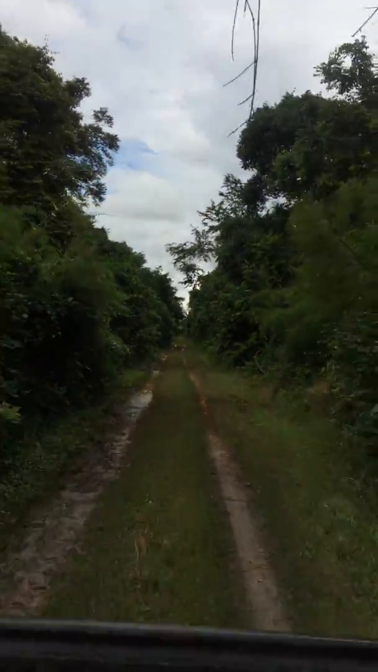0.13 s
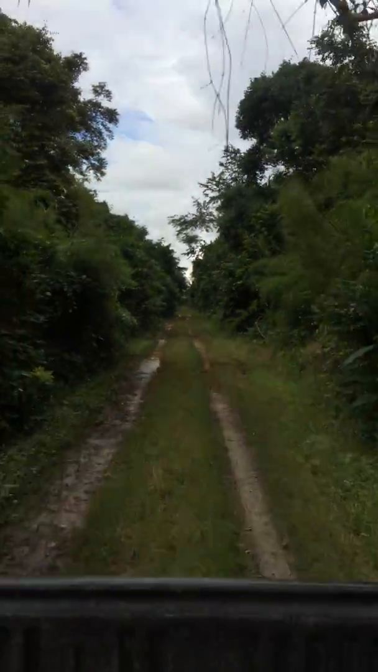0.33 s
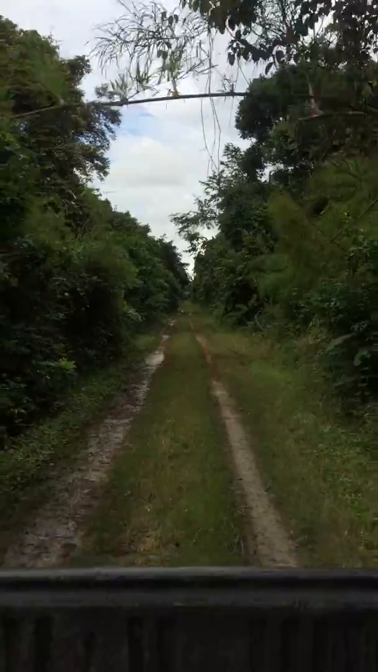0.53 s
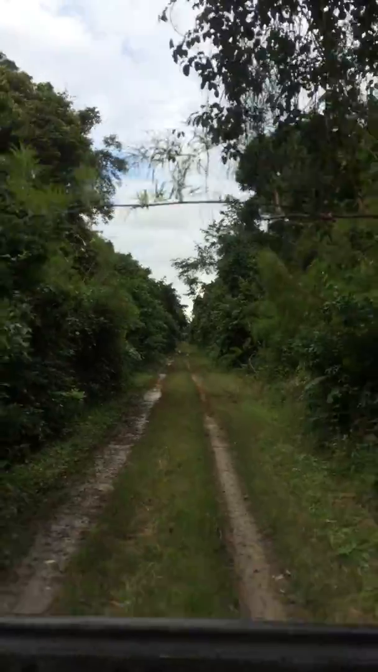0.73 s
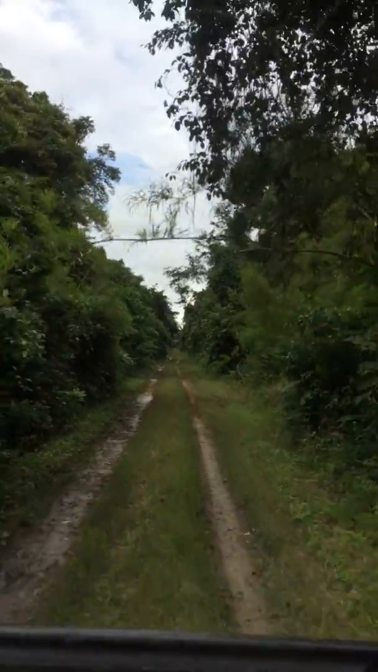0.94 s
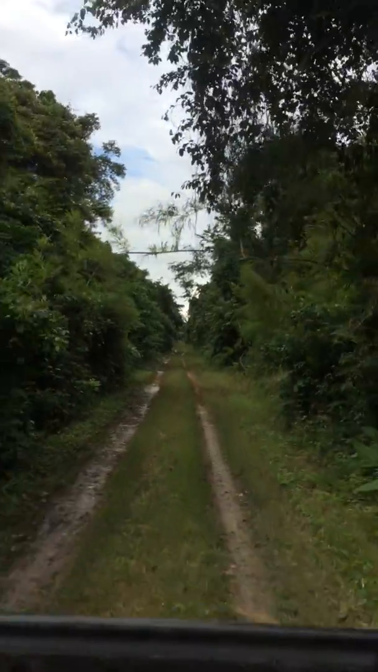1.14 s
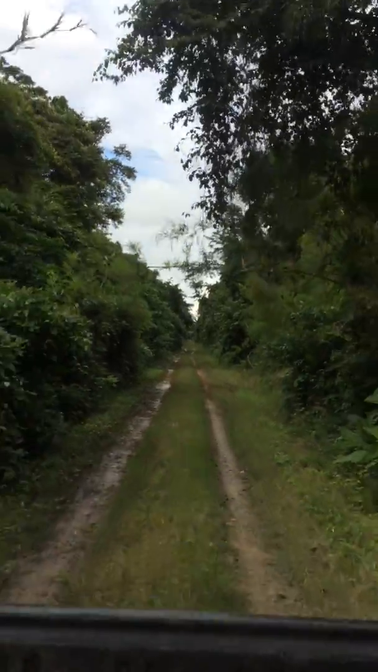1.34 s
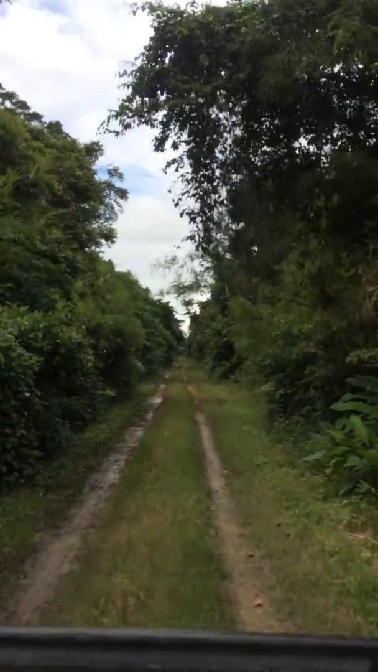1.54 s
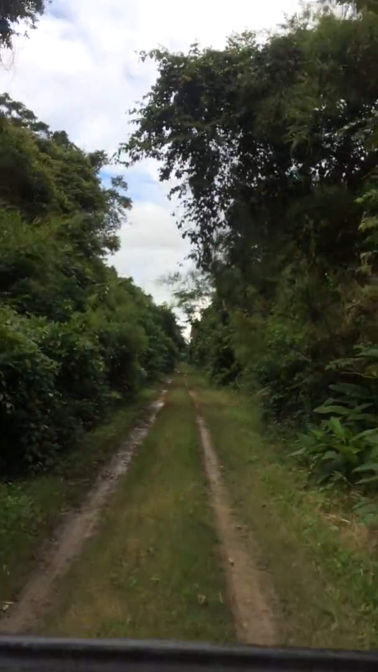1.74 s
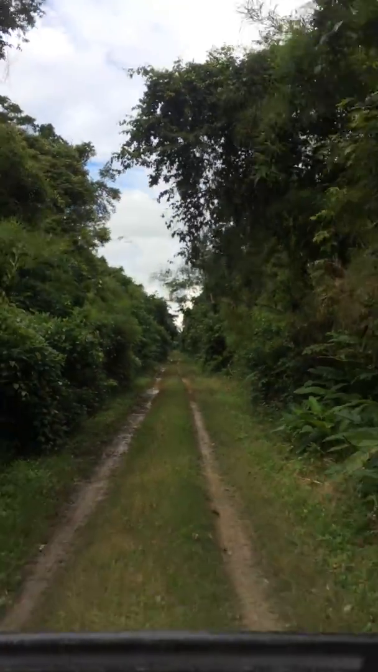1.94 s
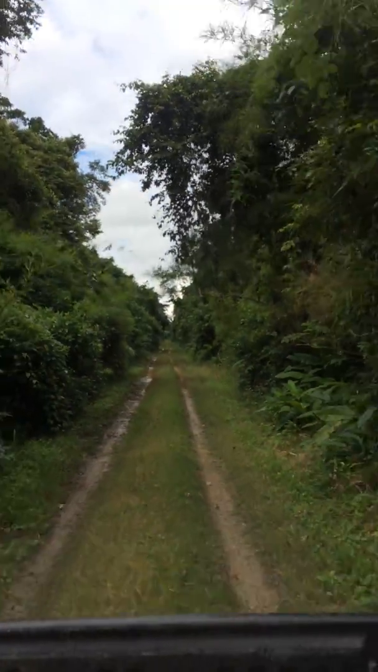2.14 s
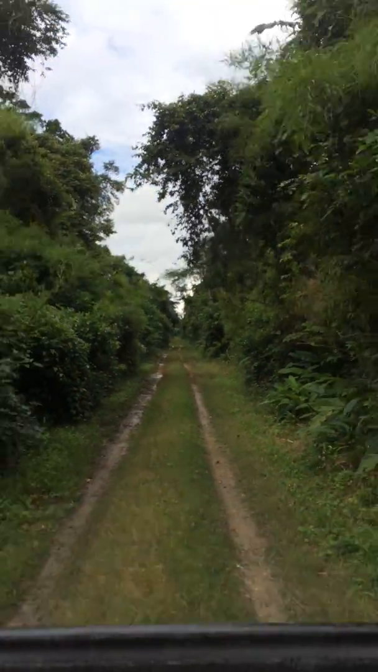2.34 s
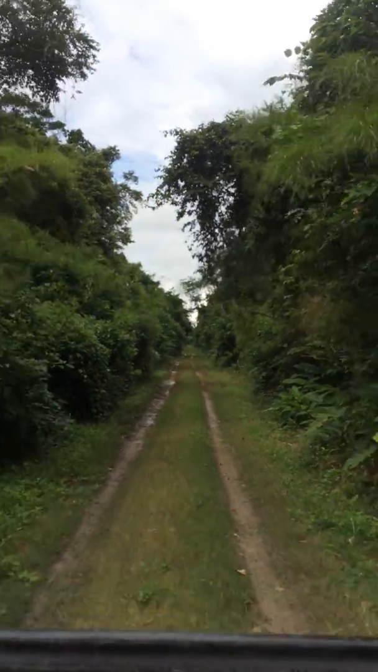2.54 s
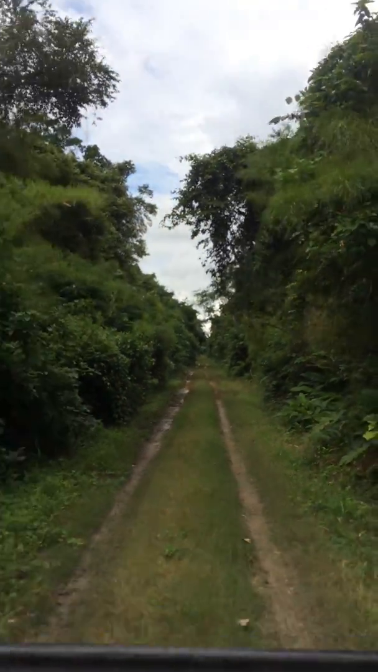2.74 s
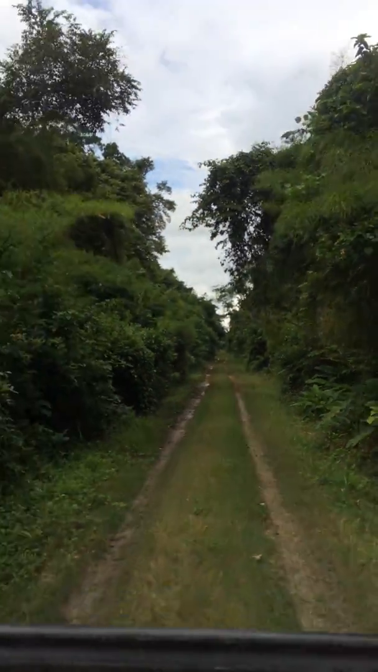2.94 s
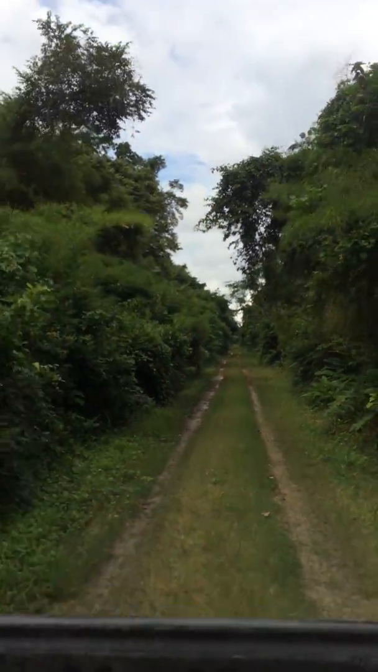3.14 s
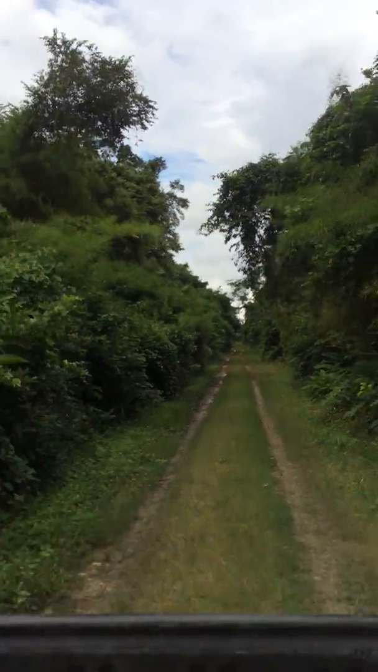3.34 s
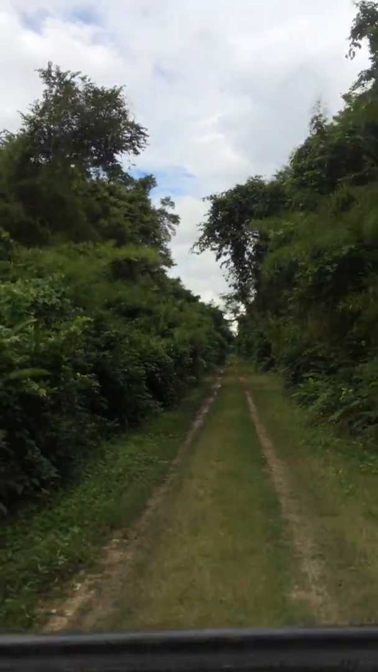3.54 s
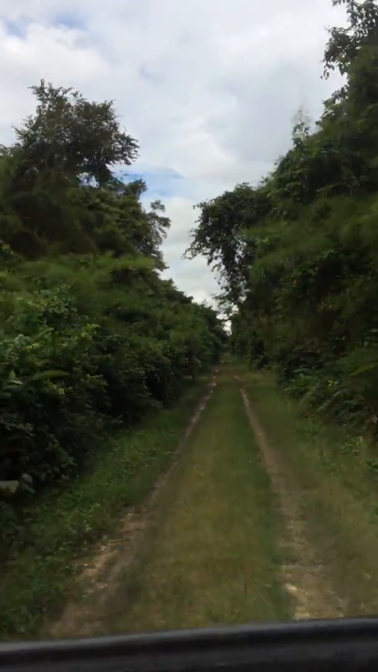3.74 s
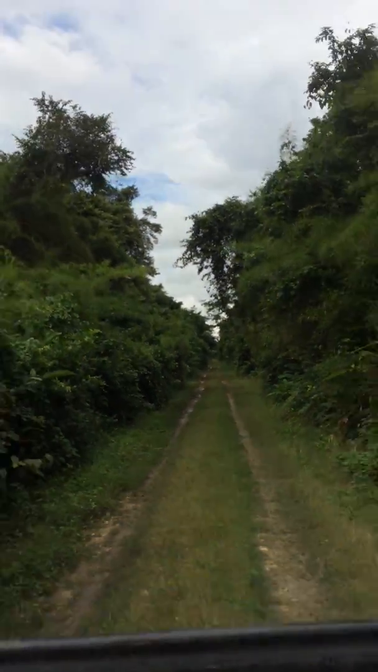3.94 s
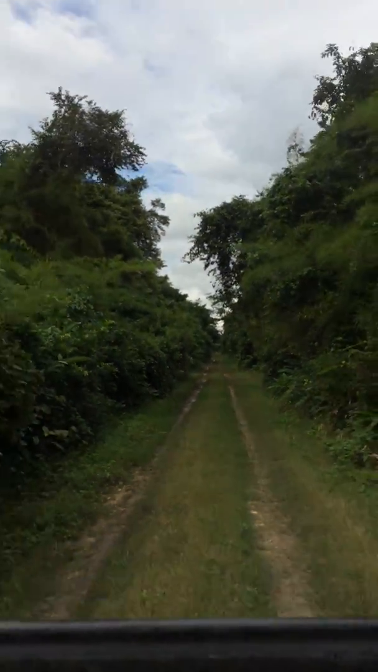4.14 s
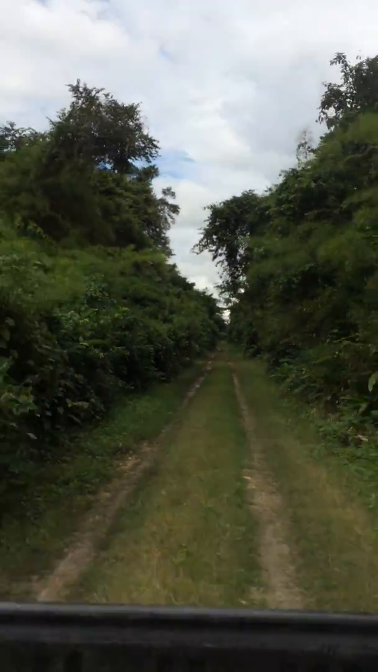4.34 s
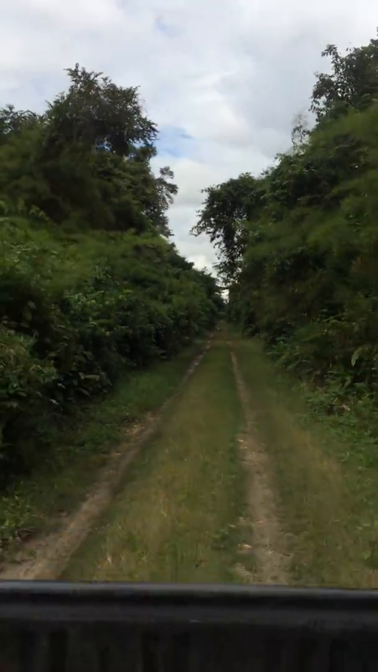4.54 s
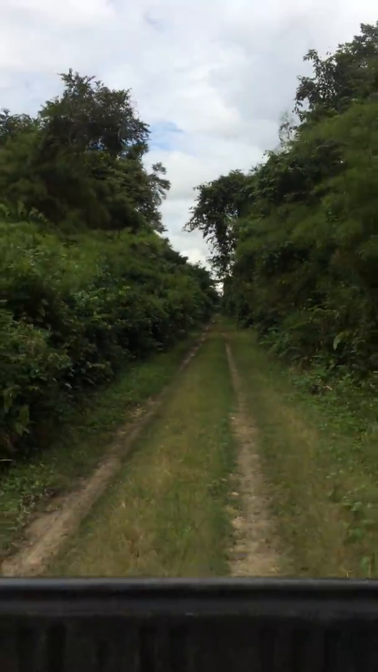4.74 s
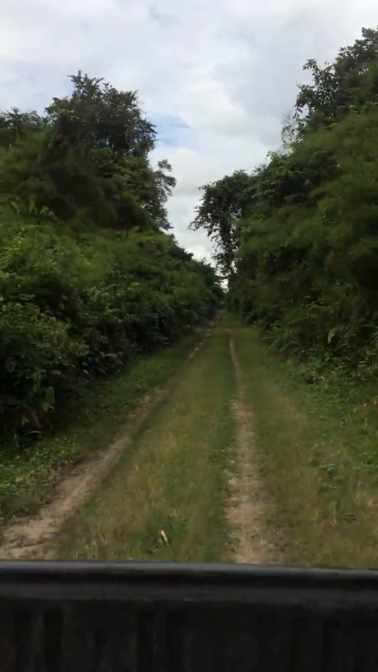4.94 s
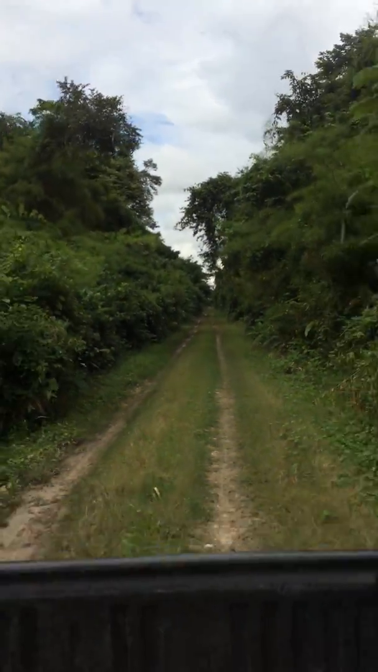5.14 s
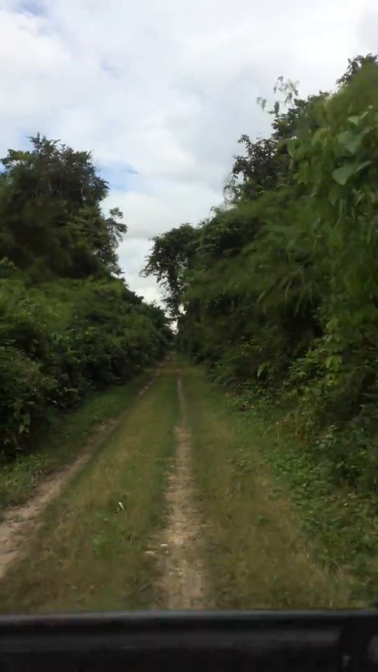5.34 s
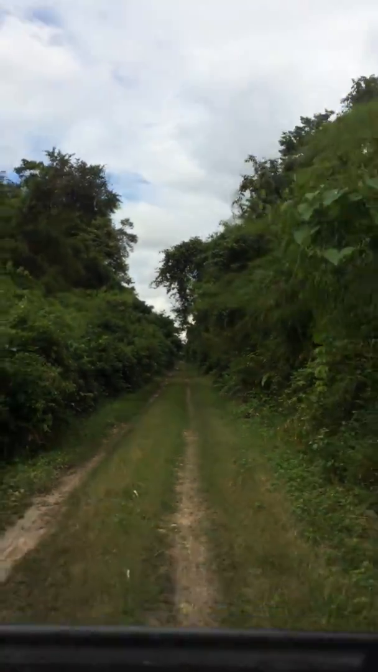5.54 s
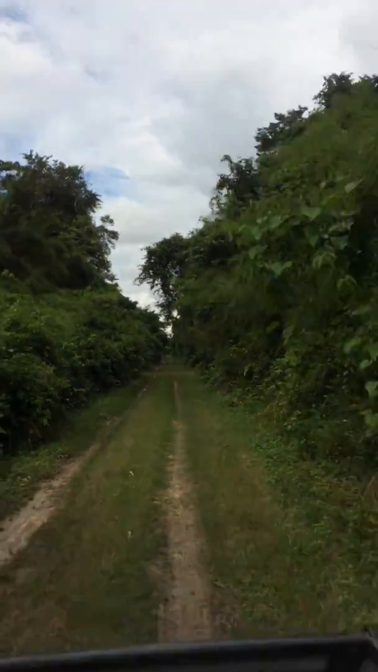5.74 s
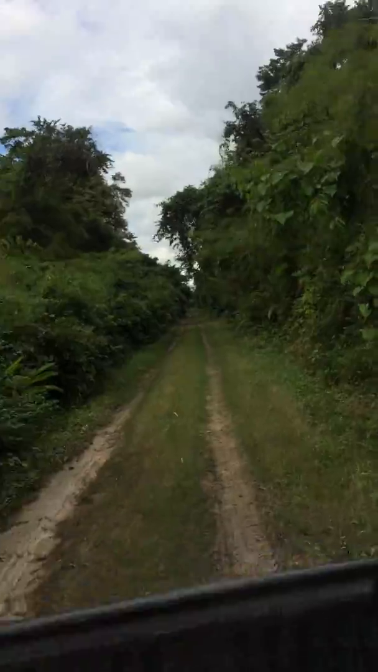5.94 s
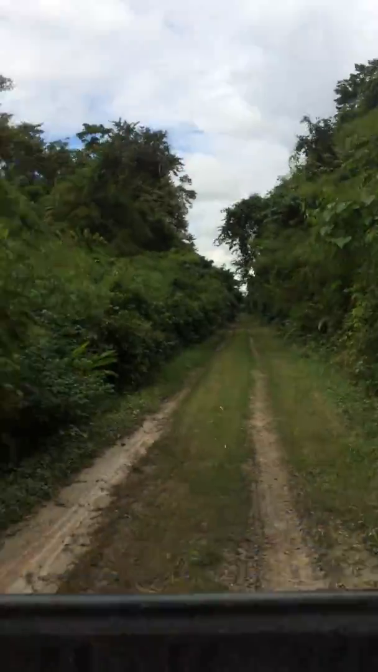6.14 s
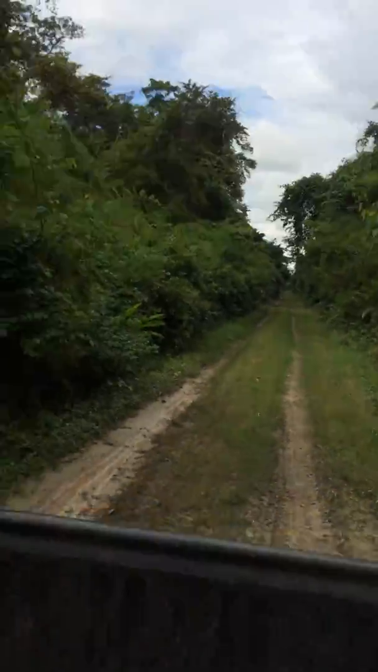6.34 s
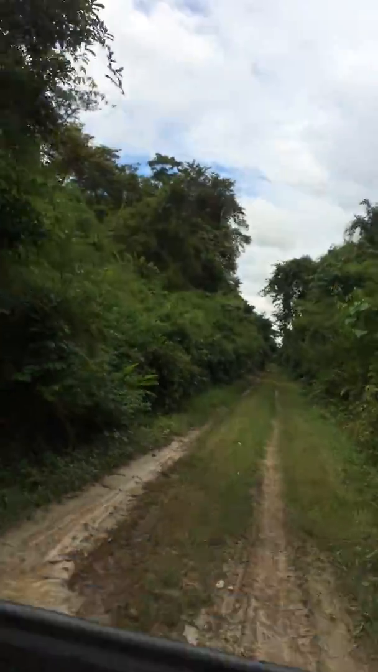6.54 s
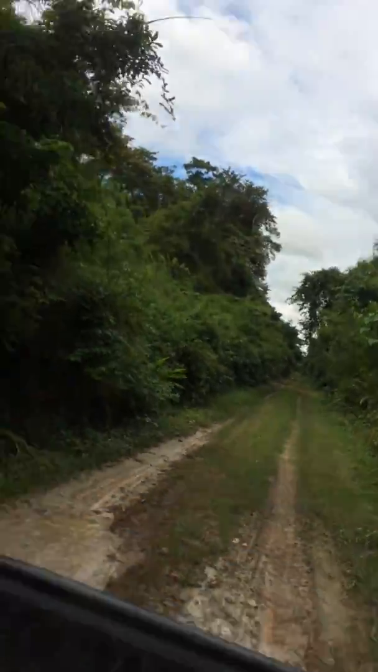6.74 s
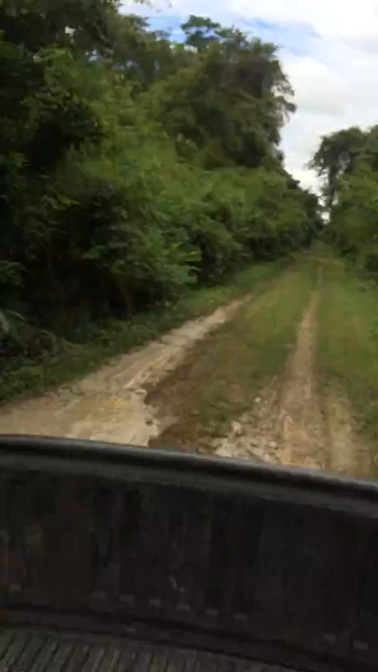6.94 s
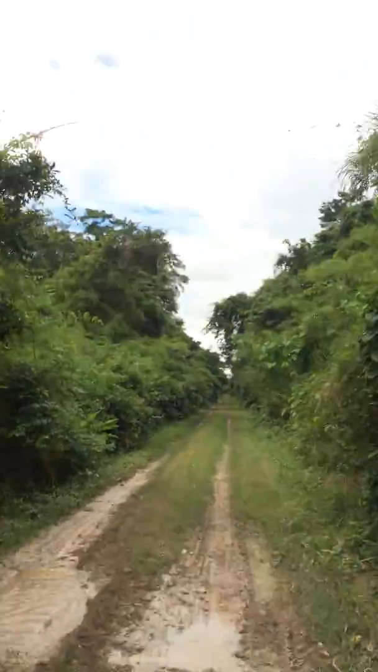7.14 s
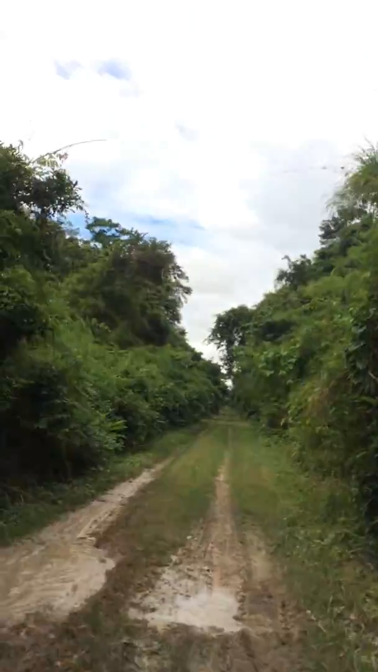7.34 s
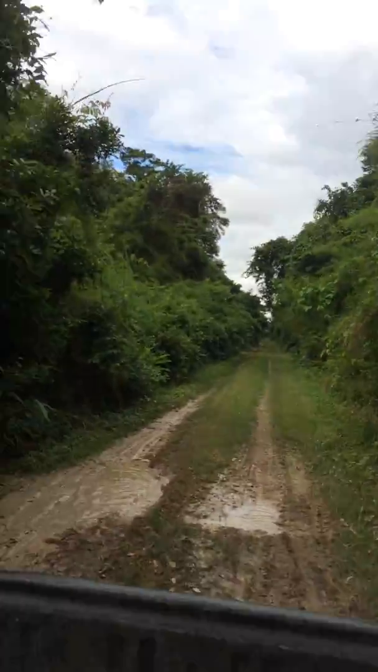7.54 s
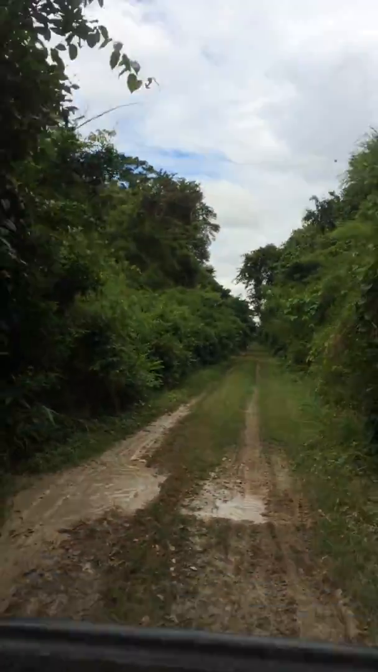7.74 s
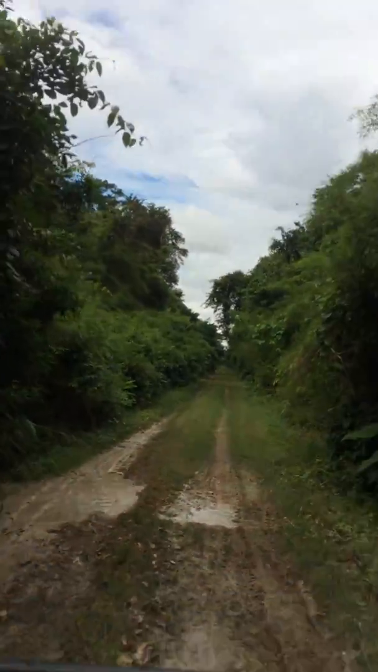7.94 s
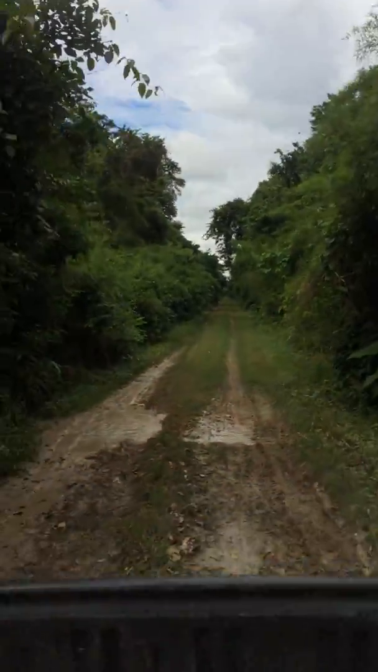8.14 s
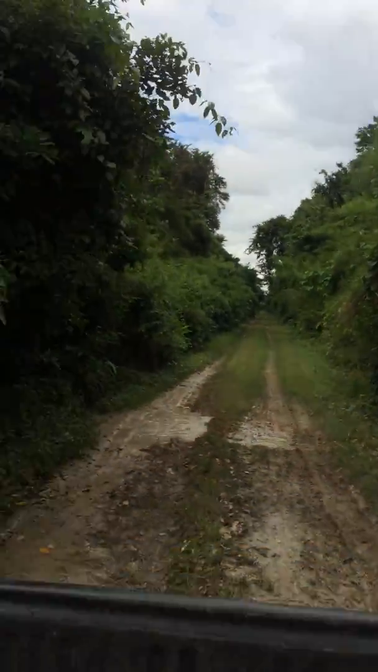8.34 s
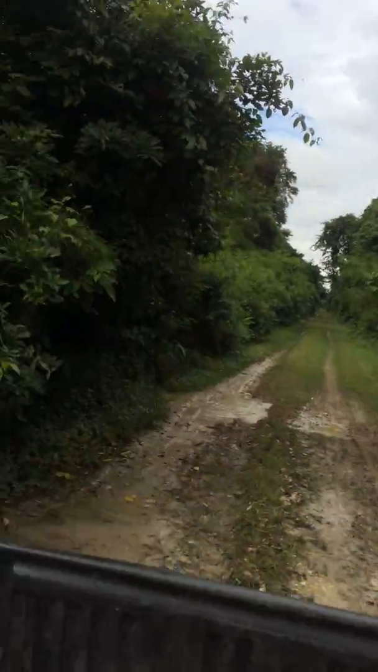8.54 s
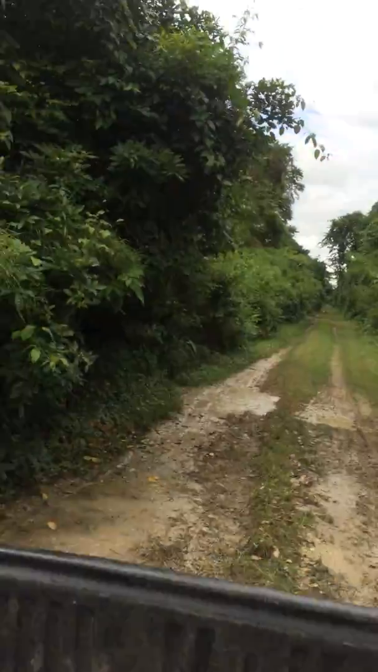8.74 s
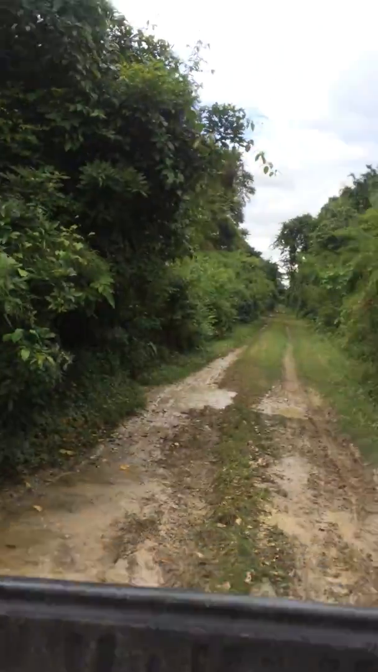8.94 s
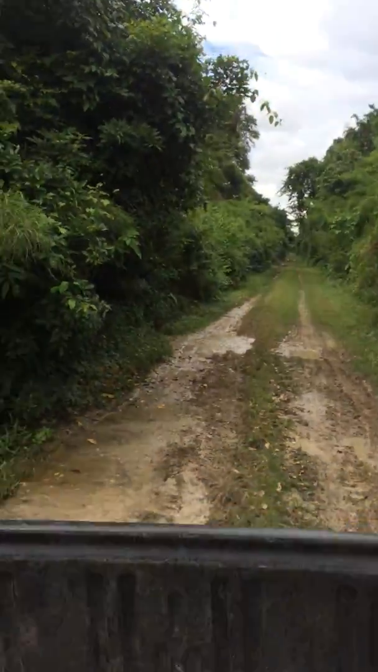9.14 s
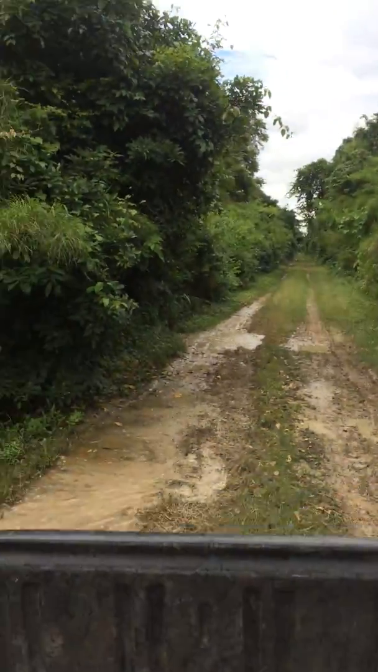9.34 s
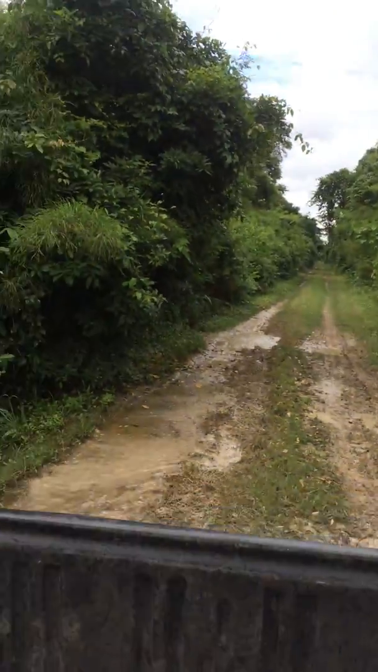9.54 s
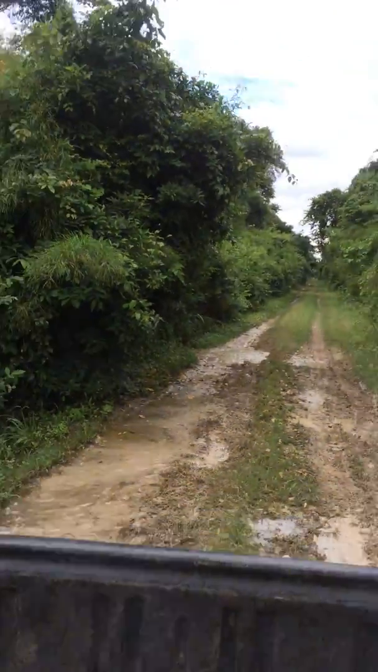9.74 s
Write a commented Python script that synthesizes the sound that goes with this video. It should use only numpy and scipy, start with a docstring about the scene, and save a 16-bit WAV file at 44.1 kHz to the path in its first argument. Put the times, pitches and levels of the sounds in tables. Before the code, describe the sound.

A pickup drives over a rutted jungle track for about ten seconds, heard from its steel bed. A deep, wavering rumble of bed and wind runs throughout, with irregular low thuds two to several times a second. Beneath it tyres hiss through grass and mud, grit patters lightly and the tailgate rattles in short metallic bursts. The floor knocks at about 0.5, 1.6, 3.6 and 5.2 seconds, then several times between 7.8 and 9.1. Tiny high spring squeaks begin at 0.5 seconds and cluster after 6.6. From 3.6 seconds stones and twigs occasionally click sharply on the body. The grass hiss swells around 5.5 to 7 seconds. From 7.1 to 7.5 a branch scrapes along the side, twigs slapping, with the loudest boom near 7.3. From 8.3 seconds to the end, an insect gives five faint, high rasps over the continuing rumble.

```python
"""A phone rides in the bed of a pickup on a rutted jungle track. From the start, ruts force the steel
bed into booms and thuds, tyres hiss through grass and mud, grit patters and the tailgate rattles in
its modes. Within a second the floor rings under a knock and a spring squeaks; both recur. From 3.6 s
stones and twigs tick on the body. Just after 7 s a branch drags along the side, sounding by friction,
and from 8.3 s an insect by the track rasps five times through one body resonance."""
import sys
import numpy as np
from scipy import signal
from scipy.fft import rfft, irfft
from scipy.io import wavfile
from scipy.ndimage import uniform_filter1d

SR = 44100
rng = np.random.default_rng(int(sys.argv[2]) if len(sys.argv) > 2 else 0)


def transcribe(u):
    """Save the signal u as a 16-bit wav file named by the first command-line argument.

    u: samples, shape (n,) or (channels, n), limited to [-1, 1]; the rate is SR.
    q: integer samples, one column per channel.
    """
    v = np.clip(np.atleast_2d(u).T, -1, 1)
    q = np.round(v * 32767).astype(np.int16)
    wavfile.write(sys.argv[1], SR, q)


N = 435694

# Spectrum of the booming bed: frequency_hz, relative_db
BOOM_SPECTRUM = [(12, -67), (20, -45), (35, -14.5), (50, -14.5), (65, -3.5), (81, 1), (97, -4.5),
                 (118, -10.5), (167, -8.5), (255, -19), (414, -34), (451, -31.5), (600, -38.5), (780, -63),
                 (1320, -120)]
# Envelope of the boom: time_s, level_db
BOOM_LEVELS = [(0, -23.5), (.36, -16), (.6, -21), (1.15, -19), (1.38, -23.5), (1.65, -19), (2.04, -25.5),
               (2.75, -20), (3.0, -25.5), (4.9, -23.5), (5.2, -19.5), (5.4, -24.5), (6.6, -24.5),
               (6.74, -21.5), (6.84, -19), (6.92, -16), (7.1, -26.5), (7.23, -17), (7.27, -3.5),
               (7.32, -12), (7.35, -28.5), (7.5, -17.5), (7.65, -25), (8.34, -18), (8.62, -22.5),
               (8.8, -23), (9.3, -20.5), (9.88, -26)]
# Jolts over ruts: peak_s, level_db, width_s, panel_relative_db
JOLTS = [(0.021, -14.5, 0.041, -23), (.112, -15, 0.076, -27), (0.204, -12, .023, -19),
         (0.271, -13, .018, -16), (.355, -9.5, 0.017, -22), (0.448, -6.5, .023, -11.5),
         (.927, -10.5, 0.011, -8.5), (1.096, -9.5, 0.024, -9.5), (1.142, -11, 0.0092, -22),
         (1.194, -8, 0.015, -17), (1.237, -7, 0.01, -27), (1.548, -9.5, 0.016, -8),
         (1.609, -6, 0.018, -2.5), (1.695, -18, .019, 6.5), (1.846, -6, .009, -14.5),
         (2.025, -15.5, .014, -19), (2.075, -5, 0.025, -14.5), (2.395, -10.5, 0.025, -13),
         (2.797, -12.5, 0.018, -14), (2.84, -5.5, .031, -15), (3.303, -6, 0.026, -7.5),
         (3.832, -2, 0.0085, -13.5), (4.166, -13, 0.025, -5.5), (4.645, -9, 0.019, -7.5),
         (5.097, -12.5, 0.021, -9), (5.24, -14.5, 0.033, -0.5), (5.856, -10, 0.036, -8.5),
         (5.908, -17, .03, 0.5), (6.232, -12, .014, -24), (6.378, -3, 0.018, -9.5),
         (6.41, -15.5, 0.033, -4.5), (6.645, -10, 0.018, -5.5), (6.723, -19, 0.048, 4),
         (6.769, -13, 0.054, -5.5), (6.911, -2, 0.013, -7), (7.108, -9.5, 0.035, -4),
         (7.216, -7.5, 0.017, -28), (7.27, -3, 0.027, -5.5), (7.415, -21, .028, 6),
         (7.513, -14.5, .024, -7.5), (7.793, -23, 0.032, 4.5), (8.097, -22.5, 0.019, 4),
         (8.156, -16, 0.023, -17), (8.349, -9, 0.026, -6.5), (8.412, -21, 0.019, -7),
         (8.747, -15, 0.025, 0), (8.796, -10.5, .017, -30), (9.054, -13.5, 0.05, -33),
         (9.095, -12, .028, -3), (9.3, -21.5, 0.054, 4.5), (9.454, -13, 0.045, -8.5)]
# Spectrum of tyre and bed noise: frequency_hz, relative_db
ROAD_SPECTRUM = [(150, -5.5), (250, -4), (362, -15.5), (442, -7.5), (560, -19), (790, -12), (1320, -23),
                 (1470, -20), (2340, -21), (3050, -30.5), (3390, -25.5), (4020, -25.5), (4970, -32),
                 (5900, -31), (16000, -31)]
# Spectrum of the grass hiss: frequency_hz, relative_db
GRASS_SPECTRUM = [(1760, -31.5), (3000, -16.5), (4230, -13), (5900, -17), (8000, -11.5), (16000, -16)]
# Envelopes of the ground noise: time_s, road_db, grass_db
GROUND_LEVELS = [(0, -32, -43), (.52, -33, -42.5), (.8, -35.5, -49.5), (1.38, -35.5, -48), (1.65, -34, -54),
                 (2.1, -39.5, -64), (2.9, -36.5, -66), (3.25, -39, -53), (3.45, -41, -57),
                 (4.3, -40.5, -54.5), (5.2, -37, -42.5), (5.5, -36.5, -40), (5.69, -33.5, -36),
                 (6.24, -33.5, -35.5), (6.55, -34.5, -38.5), (6.8, -34.5, -37.5), (7.08, -34.5, -48),
                 (7.4, -24.5, -47), (7.6, -40.5, -44), (7.84, -31, -46.5), (8.34, -36, -38.5),
                 (8.8, -31, -49), (8.94, -38.5, -43.5), (9.08, -29.5, -48), (9.46, -33.5, -43.5),
                 (9.88, -34.5, -48)]
# Loud rattles of the tailgate: start_s, level_db, clank_relative_db
RATTLES = [(.088, -31, -19), (.242, -33.5, -23), (.9205, -32.5, -24), (1.146, -49, -0.5),
           (1.215, -36.5, -15), (1.234, -39.5, -13.5), (1.3219, -37.5, -6), (1.444, -40, -9.5),
           (1.606, -39.5, -11), (1.884, -39.5, -24), (1.968, -41, -29), (2.0752, -39, -11),
           (2.264, -39.5, -26), (2.396, -46, -7), (2.528, -49, 0.5), (2.5624, -35, -19),
           (2.908, -31.5, -23), (2.9513, -33, -25), (2.968, -43, -18), (3.134, -45, -13.5),
           (3.248, -42.5, -17), (3.307, -38, -16), (3.514, -49, -6), (3.5794, -25.5, -30),
           (3.591, -39, -13), (3.612, -27.5, -11), (3.673, -36.5, -13), (3.88, -37, -29),
           (4.164, -43, -8.5), (4.364, -29, -15), (4.43, -39.5, -10.5), (4.551, -45, -5),
           (4.614, -43.5, -1), (4.778, -34.5, -15), (4.8144, -31.5, -13), (4.829, -32.5, -16),
           (5.4974, -37.5, -28), (5.514, -34, -31), (5.553, -28, -20), (5.813, -23.5, -16),
           (6.766, -37, -13.5), (7.45, -31, -26), (7.907, -36.5, -7), (8.481, -38, -5), (8.638, -41, -18),
           (8.717, -47, -11), (9.292, -40, -3), (9.534, -40, -12), (9.571, -37, -22), (9.762, -40, -8)]
# Modes of the tailgate: pitch_hz, unbroadened_width_hz, relative_db
TAILGATE_MODES = [(733, 88, 9.5), (1446, 78, 5), (1752, 22, 6), (2340, 120, 3.5), (2835, 70, 1.5),
                  (3465, 36, -8.5), (3865, 140, -6), (4256, 220, -3.5), (4710, 120, -4.5), (5070, 180, -7),
                  (5270, 210, -16)]
# Blows on the bed floor: start_s, level_db, lowest_mode_hz, tail_relative_db, tail_t60_s
FLOOR_BLOWS = [(.464, -35, 780, 2, 0.11), (1.6, -21.5, 787, -2.5, 0.055), (3.58, -19, 757, -18, .12),
               (5.242, -16.5, 820, -22, 0.21), (7.786, -34, 770, -16, .15), (7.99, -18.5, 802, -6.5, 0.06),
               (8.712, -20.5, 694, -9, 0.24), (9.057, -18, 773, -7, 0.23)]
# Modes of the bed floor: frequency_ratio, relative_db, t60_s
BED_FLOOR_MODES = [(1, 0, .12), (1.2, -6, .07), (1.45, -3, .06), (1.57, -7, .07), (2.35, -16, .04)]
# Spring squeaks: start_s, length_s, level_db, start_hz, end_hz, width_hz
SPRING_SQUEAKS = [(0.523, 0.022, -48, 2790, 2800, 150), (1.548, .026, -41, 7800, 7800, 398),
                  (6.666, 0.04, -41, 1760, 2720, 350), (6.668, 0.036, -40, 3770, 4700, 550),
                  (6.81, .063, -46, 8500, 8800, 200), (7.06, .022, -31, 7140, 7640, 300),
                  (7.067, .029, -32, 8100, 8300, 300), (7.446, 0.014, -26.5, 2790, 2640, 120),
                  (7.599, 0.038, -23.5, 7900, 7560, 200), (7.895, 0.054, -41.5, 4300, 4900, 700),
                  (8.16, .022, -43, 6740, 6450, 396), (8.332, 0.022, -31.5, 7600, 6800, 494),
                  (8.642, .02, -41, 2620, 2600, 60), (9.404, .038, -44, 7700, 7700, 500)]
# Stones and twigs striking the body: start_s, peak_db, centre_hz, width_hz
STONE_HITS = [(3.620, -9.5, 2900, 5970), (4.494, -17, 6000, 4000), (5.165, -14.5, 690, 920),
              (5.165, -17, 4450, 3500), (5.292, -15, 6000, 3960), (6.004, -22, 1500, 2500),
              (6.365, -14, 1190, 2500), (6.5943, -18.5, 596, 396), (6.596, -17, 1210, 690),
              (7.056, -20, 7000, 5970), (8.738, -8.5, 9000, 8000)]
# Pressure of the branch on the side: time_s, level_db, treble_relative_db
BRANCH_PRESSURE = [(7.08, -37, 1.5), (7.15, -23, 2), (7.182, -19.5, 5), (7.22, -19, 0.5),
                   (7.26, -23.5, 4.5), (7.304, -10.5, 6), (7.4, -25.5, -2.5), (7.444, -53, -10),
                   (7.45, -22, 6.5), (7.52, -40, 1)]
# Spectrum of the scraping: frequency_hz, relative_db
SCRAPE_SPECTRUM = [(88, -32), (150, -1), (295, -14.5), (453, -8), (589, -24), (776, -18.5), (1400, -26),
                   (2010, -23), (3090, -32.5), (4540, -32), (5900, -36), (16000, -38)]
# Twigs whipping the panel: start_s, level_db, t60_s
TWIG_SLAPS = [(7.265, -19, 0.073), (7.285, -23, 0.15), (7.448, -27, 0.065)]
# Insect rasps: start_s, length_s, level_db
INSECT_RASPS = [(8.328, 0.095, -45), (8.743, 0.15, -41), (8.962, 0.22, -41), (9.232, 0.23, -41.5),
                (9.566, 0.24, -41)]
# Response of the microphone: frequency_hz, gain_db
MIC_RESPONSE = [(20, -7.5), (45, -2.5), (5000, -1.5), (6000, -7), (7700, -18.5), (10000, -24.5),
                (15000, -32)]


def gain_of(db):
    """Amplitude ratio: tenfold for every 20 dB."""
    return 10 ** (np.asarray(db) / 20)


def unit_rms(x):
    """Normalisation to a mean power of 1."""
    return x / np.sqrt(np.mean(x ** 2) + 1e-20)


def curve(rows, column):
    """Linear interpolation of one table column over time."""
    rows = np.array(rows)
    return np.interp(np.arange(N) / SR, rows[:, 0], rows[:, column])


def add(mix, start_s, sound):
    """Superposition: a sound adds to the mix from start_s on."""
    at = round(start_s * SR)
    sound = sound[max(-at, 0):]
    part = mix[max(at, 0):][:len(sound)]
    part += sound[:len(part)]


def coloured_noise(spectrum, patchy_db, frame):
    """Spectral shaping of noise, with drifting loud and soft patches."""
    hz = np.fft.rfftfreq(frame, 1 / SR)
    real, imag, patches = rng.standard_normal((4 * N // frame + 5, len(hz), 3)).T
    patches = unit_rms(uniform_filter1d(uniform_filter1d(patches, size=6, axis=0), size=8, axis=1))
    points_hz, db = np.transpose(spectrum)
    shape_db = np.interp(np.log(hz + 1), np.log(points_hz), db, left=-90, right=-90)
    bins = (real + 1j * imag) * gain_of(shape_db[:, None] + patchy_db * patches)
    return unit_rms(signal.istft(bins, nperseg=frame, noverlap=3 * frame // 4)[1][:N])


def wobble(cutoff_hz):
    """Random modulation: low-passed noise of rms 1."""
    lowpass = signal.butter(2, cutoff_hz, fs=SR, output="sos")
    return unit_rms(signal.sosfilt(lowpass, rng.standard_normal(N)))


def resonate(x, hz, width_hz, stages=2):
    """Damped resonators in cascade, each width_hz wide; their centre hz may glide."""
    phasor = np.exp(2j * np.pi * np.cumsum(hz * np.ones(len(x))) / SR)
    pole = np.exp(-np.pi * width_hz / SR)
    for _ in range(stages):
        x = 2 * (phasor * signal.lfilter([1 - pole], [1, -pole], x / phasor)).real
    return x


def burst(rise_s, t60_s):
    """Impact envelope: a quick rise, then exponential decay."""
    t = np.arange(0, t60_s, 1 / SR)
    return (1 - np.exp(-t / rise_s)) * gain_of(-60 * t / t60_s)


def bed_boom():
    """Random forcing: bed and wind give low noise whose level wavers."""
    boom = coloured_noise(BOOM_SPECTRUM, patchy_db=2.5, frame=4096)
    return boom * gain_of(curve(BOOM_LEVELS, 1) + 2.23 * wobble(10.3))


def rut_thuds(bed_hz=83.4, panel_hz=178.7, shudder_db=-4.5):
    """Transient excitation: each rut briefly swings a bed note and a panel note; the panels shudder."""
    out, shudder = np.zeros((2, N))
    for peak_s, db, width_s, panel_db in JOLTS:
        t = np.arange(-2 * width_s, 2 * width_s, 1 / SR)
        start_s = peak_s + t[0]
        jolt = gain_of(db) * np.exp(-2.2 * (t / width_s) ** 2)
        low_hz = bed_hz * (1 + 0.11 * rng.uniform(-1, 1))
        high_hz = panel_hz * (1 + 0.32 * rng.uniform(-1, 1))
        for hz, note_db in (low_hz, 0), (high_hz, panel_db):
            add(out, start_s, jolt * gain_of(note_db) * np.cos(2 * np.pi * (hz * t + rng.random())))
        add(shudder, start_s, jolt * gain_of(panel_db + shudder_db))
    noise = rng.standard_normal(N)
    panels = resonate(noise, panel_hz, width_hz=110) + gain_of(-22) * resonate(noise, 330, width_hz=220)
    return out + shudder * unit_rms(panels)


def tyres(bumps_per_s=16):
    """Amplitude modulation: each shake of the bed puffs up the road noise, and the grass hiss less."""
    bump_count = np.floor(np.cumsum(bumps_per_s * (1 + 0.28 * wobble(6.5))) / SR)
    kicks = 1.46 * (np.diff(bump_count, prepend=0) > 0) * rng.random(N)
    kicks[[round(row[0] * SR) for row in RATTLES]] += .9  # what rattles the tailgate shakes the bed
    puffs = signal.oaconvolve(kicks, burst(rise_s=0.002, t60_s=0.27))[:N]
    road = coloured_noise(ROAD_SPECTRUM, patchy_db=2.5, frame=512) * unit_rms(1 + 0.87 * puffs)
    grass = coloured_noise(GRASS_SPECTRUM, patchy_db=0.4, frame=512) * unit_rms(1 + 0.25 * puffs)
    return road * gain_of(curve(GROUND_LEVELS, 1)) + grass * gain_of(curve(GROUND_LEVELS, 2))


def grit(grains_per_s=25):
    """Shot noise: grains strike the body at random instants, a few harder than the rest."""
    strength = gain_of(-44 + 3.5 * np.minimum(rng.exponential(1, N), 4))
    strikes = rng.random(N) < grains_per_s / SR
    tick = np.diff(rng.standard_normal(90)) * np.exp(-np.arange(89) / 20)
    return signal.oaconvolve(strength * strikes, tick)[:N]


def tailgate(faint_per_s=2.5, ring_share=0.45, broadening=2.1, clank_below_hz=3000):
    """Modal vibration: each rattle excites its own mix of modes, broadened by chatter, and a tick."""
    count = round(faint_per_s * N / SR)
    faint = zip(rng.uniform(0, N / SR, count), rng.normal(-48, 3, count), rng.normal(-12, 3, count))
    t = np.arange(0, .12, 1 / SR)
    envelope = (1 - np.exp(-t / .0005)) * np.exp(-(t / .015) ** 1.6)
    mode_levels, tick_level = np.zeros((len(TAILGATE_MODES), N)), np.zeros(N)
    for start_s, db, clank_db in RATTLES + list(faint):
        shake = gain_of(db) * envelope
        for level, (hz, _, mode_db) in zip(mode_levels, TAILGATE_MODES):
            struck_db = rng.normal(mode_db, 1.74) + (clank_db if hz < clank_below_hz else 0)
            add(level, start_s, shake * gain_of(struck_db))
        add(tick_level, start_s, shake * gain_of(-3.5) * np.exp(-t / .033))
    chatter = rng.standard_normal(N) * gain_of(1.5 * wobble(300))
    out = tick_level * unit_rms(np.diff(chatter, prepend=0))  # differencing brightens the tick
    for level, (hz, width_hz, _) in zip(mode_levels, TAILGATE_MODES):
        rough = unit_rms(resonate(chatter, hz, broadening * width_hz))
        ring = np.sqrt(2) * np.sin(2 * np.pi * (hz * np.arange(N) / SR + rng.random()))
        out += level * ((1 - ring_share) * rough + ring_share * ring)
    return out


def floor_knocks():
    """Free vibration: a blow leaves the floor's inharmonic modes decaying over a noisy tail."""
    out = np.zeros(N)
    for start_s, db, hz, tail_db, t60_s in FLOOR_BLOWS:
        fall = burst(rise_s=0.0021, t60_s=t60_s)
        t = np.arange(len(fall)) / SR
        ring = sum(gain_of(mode_db - 60 * t / ring_s) * np.sin(2 * np.pi * ratio * hz * t)
                   for ratio, mode_db, ring_s in BED_FLOOR_MODES)
        tail = unit_rms(resonate(rng.standard_normal(len(t)), hz=810, width_hz=1200, stages=1))
        add(out, start_s, gain_of(db) * (ring / abs(ring).max() + gain_of(tail_db) * fall * tail))
    return out


def spring_squeaks():
    """Narrow-band resonance: noise becomes a fuzzy, gliding whistle; squaring adds a faint octave."""
    out = np.zeros(N)
    for start_s, length_s, db, start_hz, end_hz, width_hz in SPRING_SQUEAKS:
        hz = np.linspace(start_hz, end_hz, round(length_s * SR))
        tone = unit_rms(resonate(rng.standard_normal(len(hz)), hz, width_hz))
        add(out, start_s, gain_of(db) * (tone + .015 * tone ** 2) * signal.windows.tukey(len(hz), .6))
    return out


def stone_ticks():
    """Impulse response: a stone or twig excites a heavily damped resonance of the body, one click."""
    out = np.zeros(N)
    for start_s, db, hz, width_hz in STONE_HITS:
        click = resonate(signal.unit_impulse(400), hz, width_hz)
        add(out, start_s, gain_of(db) * click / abs(click).max())
    return out


def branch_scrape(fade_s=0.018, treble_hz=1300):
    """Friction noise: it follows the branch's pressure, brightens with leaves and jumps as twigs slap."""
    t = np.arange(N) / SR
    start_s, end_s = BRANCH_PRESSURE[0][0], BRANCH_PRESSURE[-1][0]
    contact = np.clip(np.minimum(t - start_s, end_s - t) / fade_s, 0, 1)
    level = gain_of(curve(BRANCH_PRESSURE, 1)) * contact
    for slap_s, db, t60_s in TWIG_SLAPS:
        add(level, slap_s, gain_of(db) * burst(rise_s=0.00079, t60_s=t60_s))
    scrape = coloured_noise(SCRAPE_SPECTRUM, patchy_db=2.5, frame=512)
    treble = signal.sosfiltfilt(signal.butter(2, treble_hz, "high", fs=SR, output="sos"), scrape)
    treble_gain = gain_of(curve(BRANCH_PRESSURE, 2) + 1.1 * wobble(200))
    return level * (scrape - treble + treble * treble_gain)


def insect(pitch_hz=3850.0, fall_hz=250):
    """Forced resonance: noise drives one body mode, which swells and sinks in pitch with each rasp."""
    level, hz = np.zeros(N), np.full(N, pitch_hz)
    for start_s, length_s, db in INSECT_RASPS:
        size = round(length_s * SR)
        add(level, start_s, gain_of(db) * signal.windows.tukey(size, .7))
        add(hz, start_s, fall_hz * np.linspace(.5, -.5, size))
    return level * unit_rms(resonate(rng.standard_normal(N), hz, width_hz=420))


def scene():
    """Superposition: the pressures of all sources sum at one microphone."""
    truck = bed_boom() + rut_thuds() + tyres() + grit() + tailgate() + floor_knocks()
    return (truck + spring_squeaks() + stone_ticks() + branch_scrape() + insect())[None]


def record(dry, band_limit_hz=15250):
    """Transduction: the microphone colours the sound, saturates softly and limits the band."""
    hz, db = np.transpose(MIC_RESPONSE)
    response_db = np.interp(np.log(np.fft.rfftfreq(N, 1 / SR) + 1), np.log(hz), db)
    heard = irfft(rfft(dry) * gain_of(response_db), N)
    saturated = heard / (1 + heard ** 8) ** .125
    lowpass = signal.firwin(511, band_limit_hz, window=("kaiser", 9), fs=SR)
    return signal.oaconvolve(saturated, lowpass[None], "same")


dry = scene()
out = record(dry)
transcribe(out)
```